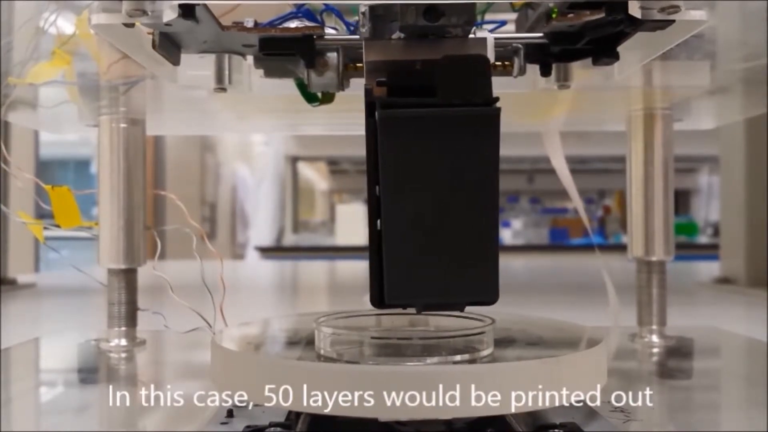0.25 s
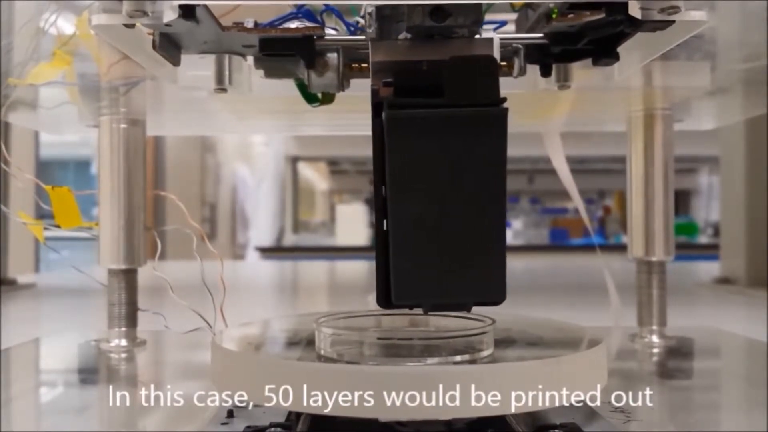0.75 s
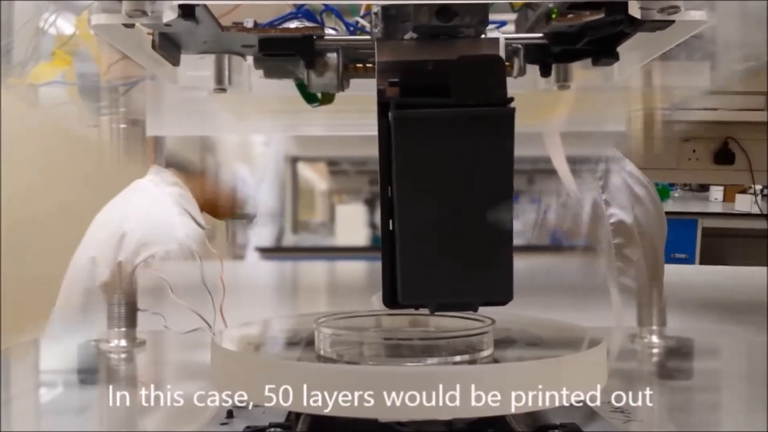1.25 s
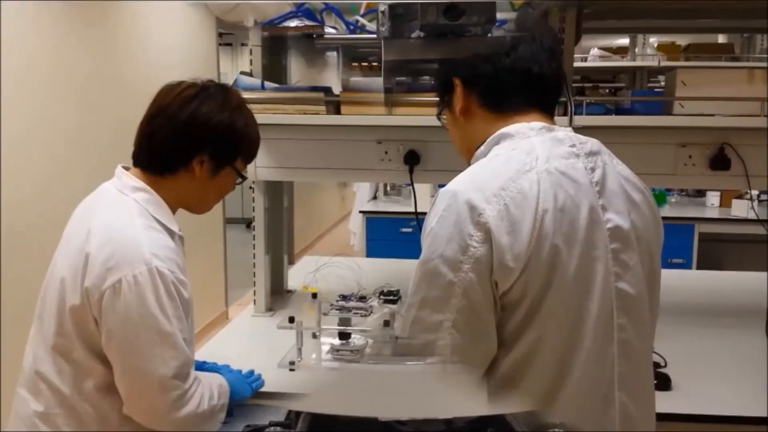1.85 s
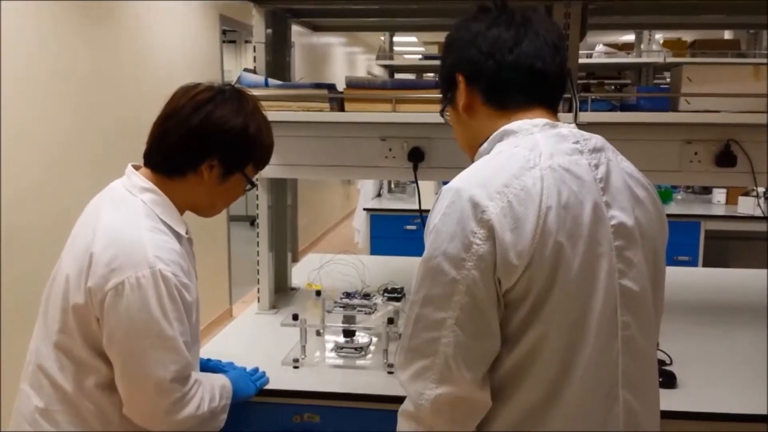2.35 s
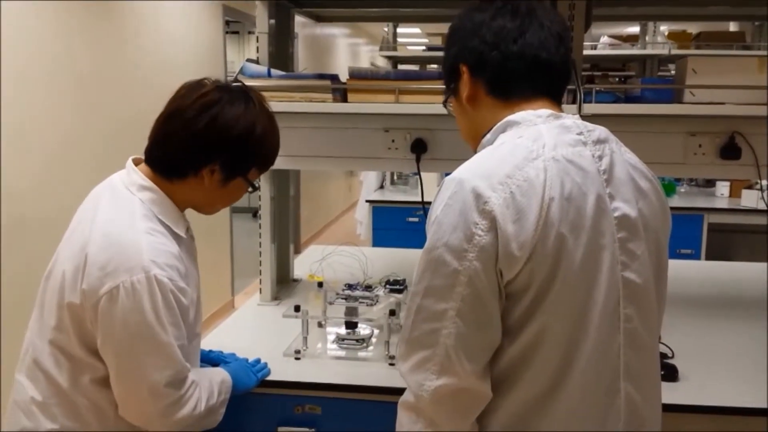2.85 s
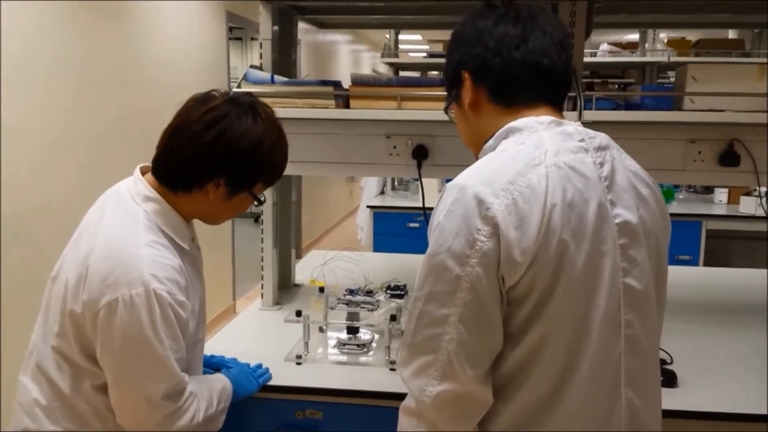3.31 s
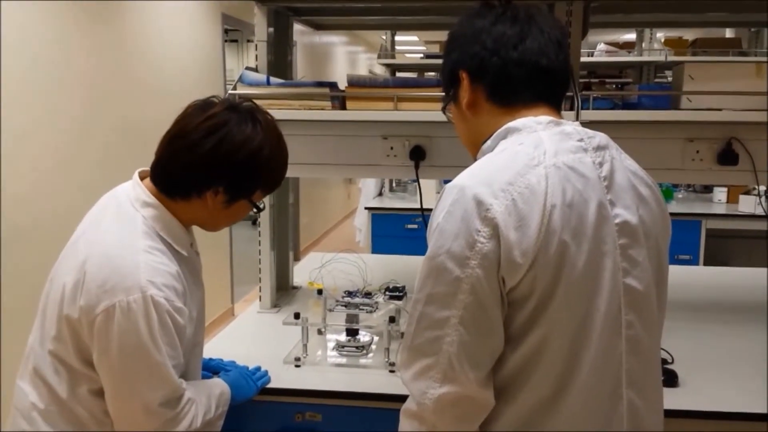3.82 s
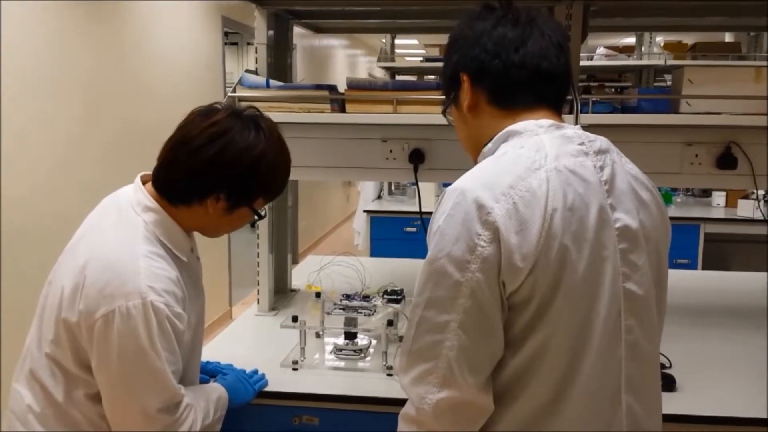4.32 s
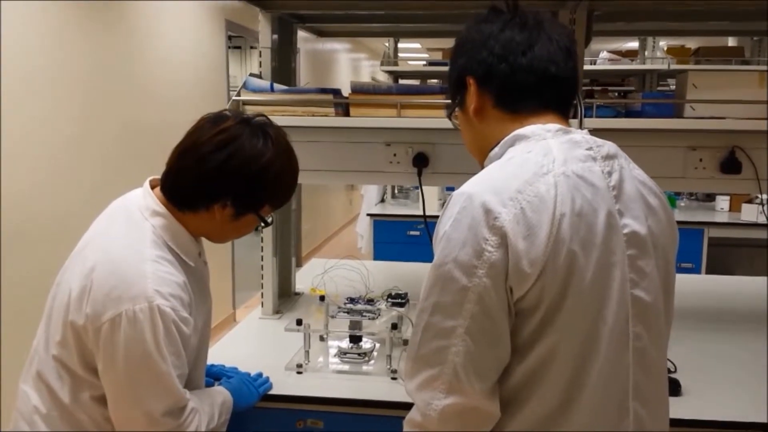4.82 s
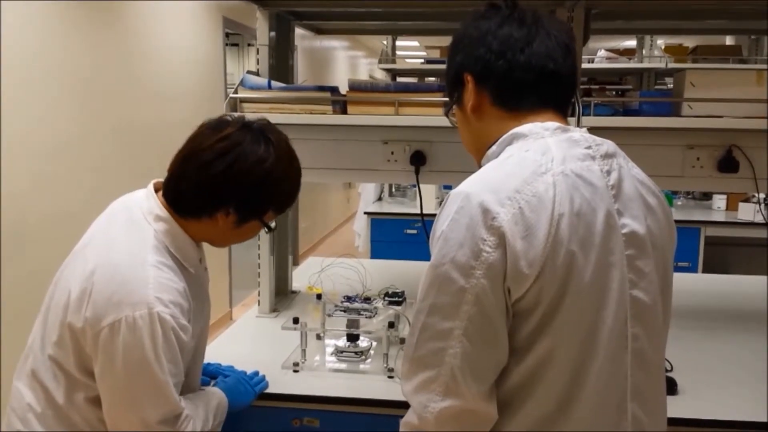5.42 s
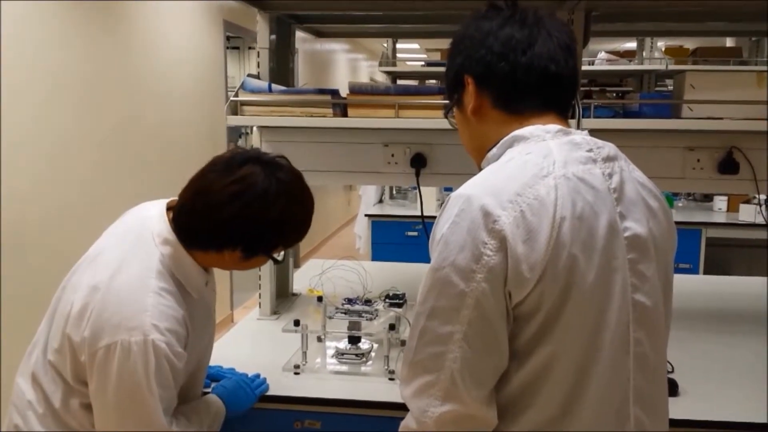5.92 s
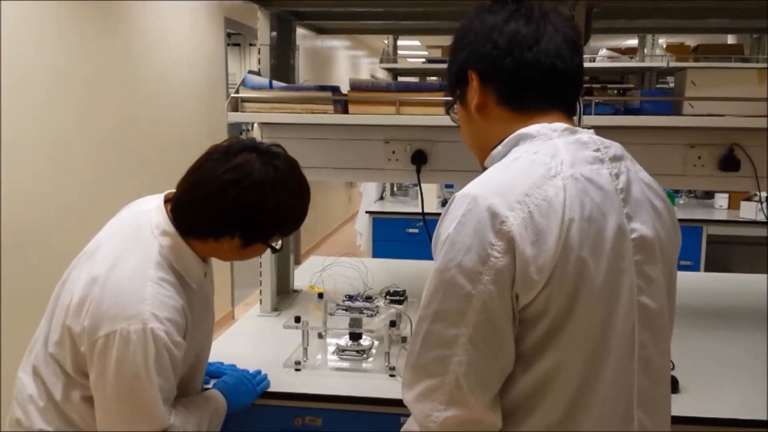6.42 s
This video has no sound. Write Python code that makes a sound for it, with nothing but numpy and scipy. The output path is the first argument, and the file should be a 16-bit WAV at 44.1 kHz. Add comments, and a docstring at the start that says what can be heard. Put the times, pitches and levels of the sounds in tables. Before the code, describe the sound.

Small lab printer buzzes raspingly close by for two seconds, drops to distant ticking beneath airy duct rumble, then one sharp electrical pop.

```python
"""A harsh buzz from close by: a small printer on a laboratory bench steps its head twenty times a second.
Each step is a few rattling blows that ring the resonances of the frame, with a dry spit of treble on top.
After two seconds the steps tick faintly from further off, under the rumble of the ventilation.
The rumble is narrow-band noise over the broad noise of the air; an electrical pop on the right,
a high-passed voltage jump, comes as the ticking ends."""
import sys
import numpy as np
from scipy import signal
from scipy.fft import rfft, irfft
from scipy.io import wavfile
from scipy.ndimage import uniform_filter1d

SR = 44100
rng = np.random.default_rng(int(sys.argv[2]) if len(sys.argv) > 2 else 0)


def transcribe(signal):
    """Save signal, clipped to [-1, 1], as a 16-bit WAV file at the path in sys.argv[1]."""
    frames = np.atleast_2d(signal).T
    limited = np.clip(frames, -1, 1)
    pcm = np.round(limited * 32767).astype(np.int16)
    wavfile.write(sys.argv[1], SR, pcm)


N = 293706
TIME = np.arange(N) / SR  # s
HZ = np.fft.rfftfreq(N, 1 / SR)

# The run of steps close by: first step in seconds, period in seconds, last moment in seconds.
NEAR_STEPS = (-.006, .04997, 1.93)


def gain_of(db):
    """Decibels to amplitude: a factor of ten for every 20 dB."""
    return 10 ** (np.asarray(db) / 20)


def evened(x):
    """Normalisation to unit rms, so that later gains set the power."""
    return x / np.sqrt(np.mean(x ** 2) + 1e-20)


def curve(rows, axis=1):
    """Linear interpolation of one column of a time table at every sample."""
    rows = np.array(rows)
    return np.interp(TIME, rows[:, 0], rows[:, axis])


def spectrum(rows):
    """Interpolation of every column of a frequency table over log frequency, at every bin."""
    table_hz, *columns = np.transpose(rows)
    return np.array([np.interp(np.log(HZ + 1), np.log(table_hz), column) for column in columns])


def colour(x, gain):
    """Minimum-phase (causal) filtering: white noise of rms 1 gets the density gain squared per Hz."""
    cepstrum = irfft(np.log(np.maximum(gain, 1e-7)), N)
    # folding the cepstrum onto positive times makes the response causal
    cepstrum[..., 1:N // 2] *= 2
    cepstrum[..., N // 2 + 1:] = 0
    response = np.exp(rfft(cepstrum))
    return irfft(rfft(x) * response, N) * np.sqrt(SR / 2)


def resonances(rows):
    """Superposition of damped modes, left and right, with the Q held to 45 by losses in the joints."""
    power = 0
    for hz, width, left, right in rows:
        detune = 1.29 * (HZ - hz) / max(width, hz / 45)  # half power at half the width
        peak = gain_of([[left], [right]])
        power = power + (peak / (1 + detune ** 2)) ** 2
    return np.sqrt(power)


def fine_modes(ripple_db, spacing_hz):
    """Modal density: countless small modes and reflections ripple the treble, differently in each channel."""
    knots = rng.standard_normal((2, 1000))
    ripple = np.array([np.interp(HZ / spacing_hz, np.arange(len(k)), k) for k in knots])
    onset = np.clip(HZ / 1500 - 1, 0, 1)  # none below 1500 Hz, full from 3000 Hz
    gain = gain_of(ripple_db * onset * np.tanh(ripple))
    # the mean power of each neighbourhood stays level
    return gain / np.sqrt(uniform_filter1d(gain ** 2, size=N // 64, axis=1))


def step_shape(period, blows, tail_db, tail_s):
    """Impact and decay: each blow of a step swells, dies exponentially and leaves a weaker, longer tail."""
    t = TIME[:round(period * SR)]
    power = 0
    for delay, db, rise, decay in blows:
        age = (t - delay) % period
        swell = np.sin(np.pi / 2 * np.minimum(age / rise, 1))
        since_peak = np.maximum(age - rise, 0)
        burst = np.exp(-since_peak / decay)
        tail = gain_of(tail_db) * np.exp(-since_peak / tail_s)
        power = power + (gain_of(db) * swell) ** 2 * (burst ** 2 + tail ** 2)
    return evened(np.sqrt(power))


def jolt(shape):
    """Periodic excitation: contacts that recur at each step drive all harmonics about equally."""
    # How closely the jolt follows the blows; heavy parts respond more evenly.
    # Each row: band from Hz, band to Hz, exponent on the step shape.
    bands = [(0, 600, .65), (600, 1800, .7), (1800, 20000, 1)]
    hz = np.fft.fftfreq(len(shape), 1 / SR)
    total = 0
    for low, high, exponent in bands:
        force = rng.standard_normal(len(shape)) + 1j * rng.standard_normal(len(shape))
        # impose the envelope in time and equal harmonics in frequency by turns
        for _ in range(10):
            harmonics = np.fft.fft(shape ** exponent * np.exp(1j * np.angle(force)))
            in_band = (hz > low) * (hz <= high)
            force = np.fft.ifft(np.exp(1j * np.angle(harmonics)) * in_band)
        total = total + force.real
    return evened(total)


def printer(run, shape, ring, repeat, force, jitter_s, uneven_db, grain):
    """Forced vibration: steps uneven in time and strength drive the body with a recurring jolt and chatter."""
    first, period, last = run
    step = np.maximum((TIME - first) // period, 0).astype(int)
    late, strong = rng.standard_normal((step[-1] + 1, 2)).T
    since_step = (TIME - first) % period - jitter_s * late[step]
    place = np.round(since_step * SR).astype(int) % len(shape)
    force_db = np.array([curve(force, axis=1), curve(force, axis=2)])
    level = gain_of(uneven_db * strong[step] + force_db)
    level *= (TIME >= first) & (TIME < last)
    grains = np.exp(grain * rng.standard_normal(N))  # uneven strength from sample to sample
    chatter = shape[place] * evened(rng.standard_normal((2, N)) * grains)
    share = np.clip(spectrum(repeat), .02, .98)
    recurring = colour(level * jolt(shape)[place], ring * np.sqrt(share))
    # the bass reaches both channels together; the treble leaves different parts and arrives out of step
    phase = np.maximum(HZ - 1000, 0) / 240  # radians
    recurring[1] = irfft(rfft(recurring[1]) * np.exp(1j * phase), N)
    return recurring + colour(level * chatter, ring * np.sqrt(1 - share))


def snap(shape, sharpness, low_hz, high_hz):
    """Amplitude-modulated noise: each contact gives a dry spit of top treble that does not ring."""
    # Loudness of the spit. Each row: time in seconds, left level in dB rms, right level in dB rms.
    snap_db = [(.9, -53, -41), (1.3, -53.5, -44), (1.9, -53, -45)]
    first, period, last = NEAR_STEPS
    place = ((TIME - first) % period * SR).astype(int) % len(shape)
    band = signal.butter(2, [low_hz, high_hz], "band", fs=SR, output="sos")
    hiss = signal.sosfilt(band, rng.standard_normal((2, N)))
    level = gain_of([curve(snap_db, axis=1), curve(snap_db, axis=2)]) * (TIME < last)
    return evened(hiss) * evened(shape ** sharpness)[place] * level


def near_printer():
    """Source and resonator close by: the blows of each step ring the frame, head and rails."""
    # Blows within one step. Each row: delay in seconds, relative level in dB, rise and decay in seconds.
    near_blows = [(.0015, -21.5, 0.003, 0.0024), (.0055, -5.5, .0028, 0.0017), (.014, -2, .003, 0.0022),
                  (.021, -10.5, 0.00324, 0.0032)]
    # Resonances of frame, head and rails, ahead of the overall trim.
    # Each row: frequency in Hz, least width in Hz, left and right level in dB per Hz.
    near_body = [(151, 67, -58, -58), (278.7, 23, -56, -51), (365.6, 53.0, -54, -53), (553, 38, -61.5, -60),
                 (709, 41, -67, -67.8), (810, 69, -65, -63.5), (942, 77, -64.5, -63), (1260, 48, -66, -70),
                 (1427, 85, -63.5, -73.5), (1520, 280, -69, -70), (2230, 186, -62, -65.5),
                 (2516, 27, -58, -85), (2700, 680, -76, -71), (3430, 560, -74, -66),
                 (3820, 150, -72.5, -77), (4570, 230, -72, -73), (5057, 290, -62, -71.5),
                 (5900, 260, -58, -73), (6195, 380, -58.5, -71), (6680, 710, -63.5, -79),
                 (7250, 261.0, -73, -68), (8840, 1240, -79.5, -76), (10340, 360, -80, -74),
                 (11260, 1200, -84.5, -76), (13850, 480, -89, -77.5), (15040, 261.0, -81, -78)]
    # Vibration that is the same at every step, the rest being loose chatter.
    # Each row: frequency in Hz, share of the power from 0 to 1.
    near_repeat = [(140, 0.82), (280, 0.98), (950, 0.79), (1500, 0.42), (2500, .55), (6000, 0.15),
                   (12000, 0.45)]
    # Force of the steps. Each row: time in seconds, left gain in dB, right gain in dB.
    near_force = [(0, 0, 0.4), (.9, 0.3, 1), (1.401, -0.1, 0), (1.9, -0.5, 0.7)]
    shape = step_shape(NEAR_STEPS[1], near_blows, tail_db=-18, tail_s=0.017)
    ring = resonances(near_body) * fine_modes(ripple_db=4.0, spacing_hz=94.87) * gain_of(-0.48)
    body = printer(NEAR_STEPS, shape, ring, near_repeat, near_force,
                   jitter_s=.00002, uneven_db=0.5, grain=0.48)
    return body + snap(shape, sharpness=1.3, low_hz=4470, high_hz=12500)


def air(rows, level_db):
    """Partly coherent noise of the room: alike in both channels in the bass, unrelated in the treble."""
    # Likeness of the channels. Each row: frequency in Hz, coherence from 0 to 1.
    likeness = [(100, 1), (260, 0.89), (430, 0.72), (700, 0.49), (1000, 0.08), (1400, 0)]
    a, b = rfft(rng.standard_normal((2, N)))
    same = np.clip(spectrum(likeness)[0], 0, 1)
    pair = np.array([a, same * a + np.sqrt(1 - same ** 2) * b])
    noise = irfft(pair * gain_of(spectrum(rows)), N) * np.sqrt(SR / 2)
    return noise * gain_of(curve(level_db))


def hum(hz, width_hz):
    """Narrow-band noise of rms 1, heard as a tone that wavers."""
    band = 1 + ((HZ - hz) / width_hz) ** 2
    return evened(irfft(rfft(rng.standard_normal(N)) / band, N))


def ventilation():
    """Narrow-band noise, amplitude-modulated: a throbbing, later swelling boom in ducts, and tones of fans."""
    # Level of the boom ahead of throb and swells. Each row: time in seconds, level in dB rms.
    boom_db = [(0, -41), (.25, -37.5), (1.9, -36.5), (2.2, -38), (2.5, -48.5), (4.0, -49.5), (4.6, -44),
               (5.2, -49), (6.66, -46)]
    # Swells of the boom. Each row: time of the top in seconds, half length in seconds, gain in dB.
    boom_swells = [(3.354, 0.045, 11), (6.35, 0.082, 9)]
    # Wavering tones of fans. Each row: frequency in Hz, half width in Hz, level in dB rms.
    fan_tones = [(32.6, 5.3, -50.5), (200.5, 11.6, -49.5), (280.1, 3, -54.5), (393.7, 9.1, -55.5),
                 (977, 15, -65)]
    throb_period_s, throb_peak_s, throb_end_s, throb_depth_db = .196, 0.97, 2.45, 4
    boom = hum(hz=143.0, width_hz=21.6)
    throb = throb_depth_db * np.cos(2 * np.pi * (TIME - throb_peak_s) / throb_period_s)
    throb = throb * (TIME < throb_end_s)
    swells = sum(db * np.exp(-((TIME - top) / half) ** 2) for top, half, db in boom_swells)
    # level the noise's own slow wavering before the drawn loudness is applied
    boom = boom / np.sqrt(uniform_filter1d(boom ** 2, size=SR // 8))
    boom = boom * gain_of(curve(boom_db) + throb + swells)
    return boom + sum(gain_of(db) * hum(hz, width) for hz, width, db in fan_tones)


def far_printer():
    """The same source and resonator from further off: thin ticks, mostly on the right, and a faint buzz."""
    # The run of steps: first step in seconds, period in seconds, last moment in seconds.
    far_steps = (1.9455, .05004, 6.505)
    # Blows within one step, where bench echoes follow at once.
    # Each row: delay in seconds, relative level in dB, rise and decay in seconds.
    far_blows = [(.0016, -3, 0.00113, 0.0017), (.0048, -2.5, 0.00114, 0.0019), (.009, -9, .001, 0.0087)]
    # Resonances of frame, head and rails, ahead of the overall trim.
    # Each row: frequency in Hz, least width in Hz, left and right level in dB per Hz.
    far_body = [(280, 26.5, -72, -72.5), (378, 44, -77.5, -74.5), (955, 70, -86, -84),
                (1770, 37, -88, -86.5), (2509.0, 284.0, -95.5, -90.5), (3605, 210, -102.5, -89),
                (4840, 650, -106.6, -86.5), (5000, 48, -105.9, -82.5), (5870, 590, -103.7, -89),
                (6890, 110, -105.9, -86), (7160, 110.0, -117.0, -86.5), (8050, 1100, -114.3, -93),
                (9177.0, 440, -113.1, -90), (10120, 360, -114.8, -86), (10500, 200, -111.5, -86.5),
                (11260, 1200, -111.0, -90)]
    # Vibration that is the same at every step. Each row: frequency in Hz, share of the power from 0 to 1.
    far_repeat = [(300, 0.94), (1000, 0.74), (2500, 0.31), (10000, 0.25)]
    # Force of the steps. Each row: time in seconds, left gain in dB, right gain in dB.
    far_force = [(2, 0.0061, 0.7), (4.198, 0.0047, 0.15), (4.55, 0, 1.7), (4.9, 0, -0.5), (5.2, 0, -0.7),
                 (5.45, 0, 2.1), (6.5, 0, 2.1)]
    shape = step_shape(far_steps[1], far_blows, tail_db=-12.5, tail_s=0.023)
    ring = resonances(far_body) * fine_modes(ripple_db=8.0, spacing_hz=55) * gain_of(-0.9)
    return printer(far_steps, shape, ring, far_repeat, far_force,
                   jitter_s=.00003, uneven_db=.5, grain=0.4)


def pop(start_s, height, corner_hz, damping):
    """Step response of a second-order high-pass: a voltage jump, pulled back to zero by the bass cut."""
    w = 2 * np.pi * corner_hz
    b, a = signal.bilinear([1, 0, 0], [1, 2 * damping * w, w * w], SR)
    jump = 1. * (TIME >= start_s)
    return height * signal.lfilter(b, a, jump) * gain_of([[-45], [0]])  # almost all on the right


def scene():
    """Superposition of printer, room and pop."""
    # Air noise at the two places, ahead of its loudness.
    # Each row: frequency in Hz, left level in dB per Hz, right level in dB per Hz.
    near_air = [(22.0, -61.4, -57), (40.0, -53.5, -58), (71.6, -68, -65), (157, -55.5, -55.5),
                (290, -62, -62), (545, -68, -67), (910, -77, -76.5), (1560, -79, -81), (2640, -82, -81.5),
                (4170, -88, -87), (7100, -86, -83.5), (10300, -95, -88), (14100, -99.6, -98)]
    far_air = [(18.0, -67, -62), (33.0, -68.5, -61.5), (64.6, -66, -67.5), (137, -61.5, -61),
               (231, -68, -67), (425, -74.5, -74), (756, -84, -81.5), (910, -84.5, -82.5),
               (1530, -93, -90.5), (2400.0, -96, -91.5), (3300.0, -101.6, -94), (6100, -104.5, -91),
               (10600, -104.8, -94.5), (13700, -104, -100.7)]
    # Loudness of each air noise. Each row: time in seconds, gain in dB.
    near_air_db = [(0, -7), (0.801, -6), (1.201, -3.5), (2.0, -2.5), (2.261, -4), (2.33, -24)]
    far_air_db = [(2.2, -27), (2.289, 1.5), (6.505, 1.5), (6.523, -5), (6.66, -4)]
    room = air(near_air, near_air_db) + air(far_air, far_air_db) + ventilation()
    click = pop(start_s=6.51108, height=1.08, corner_hz=106, damping=0.6)
    return near_printer() + far_printer() + room + click


def record(dry):
    """Band limiting by a linear-phase low-pass."""
    lowpass = signal.firwin(161, 14800, window=("kaiser", 9), fs=SR)  # edge in Hz
    return signal.oaconvolve(dry, lowpass[None], "same", axes=1)


dry = scene()
out = record(dry)
transcribe(out)
```